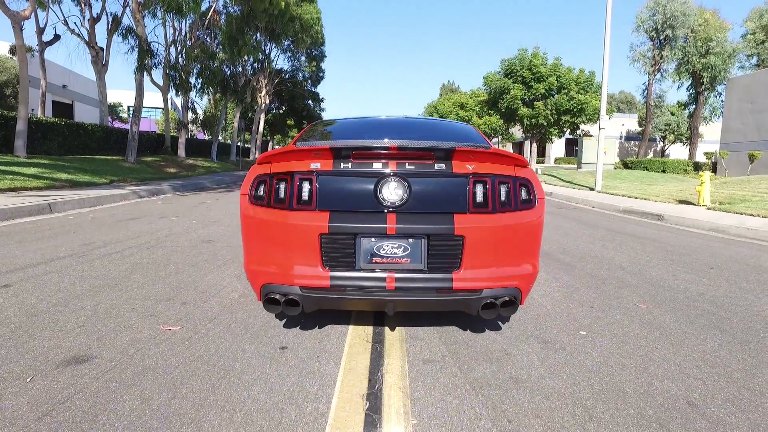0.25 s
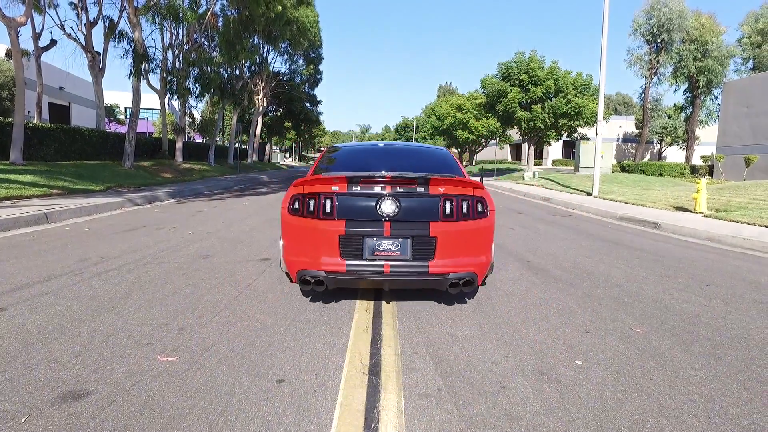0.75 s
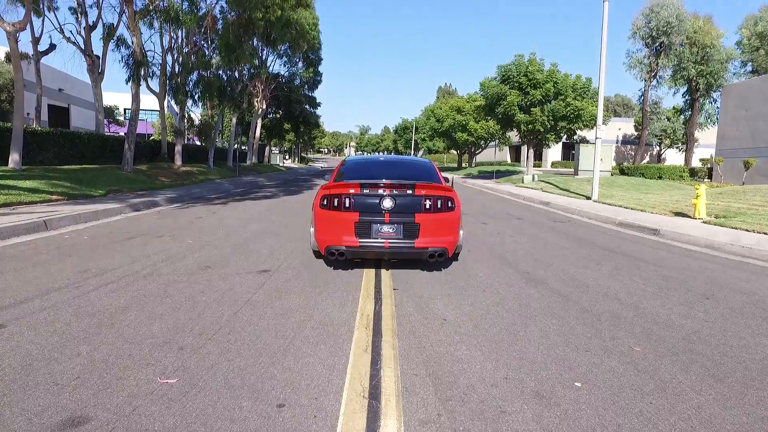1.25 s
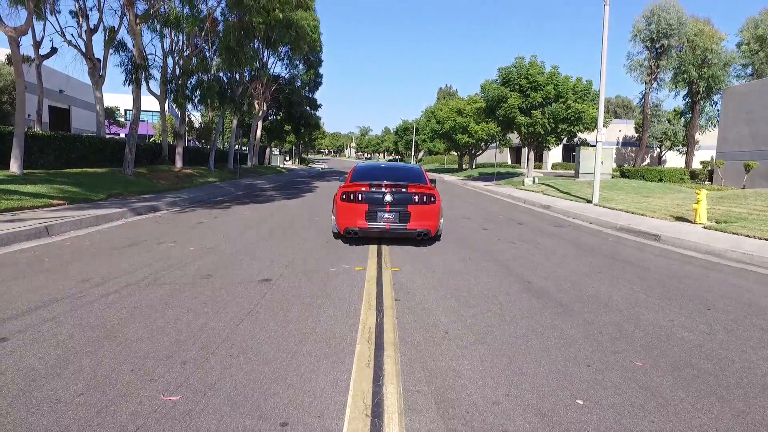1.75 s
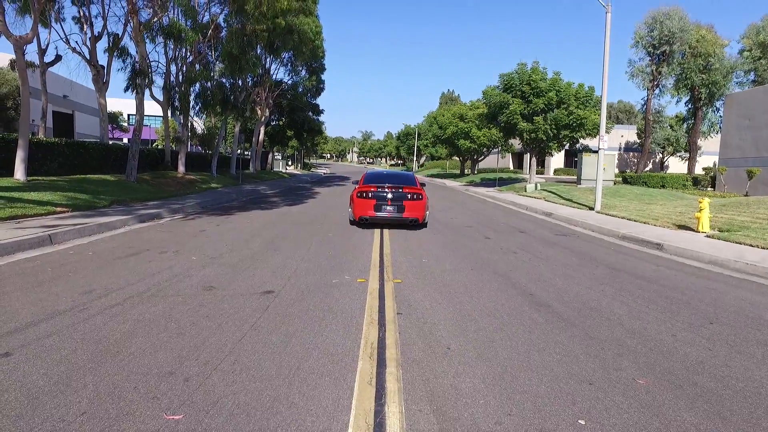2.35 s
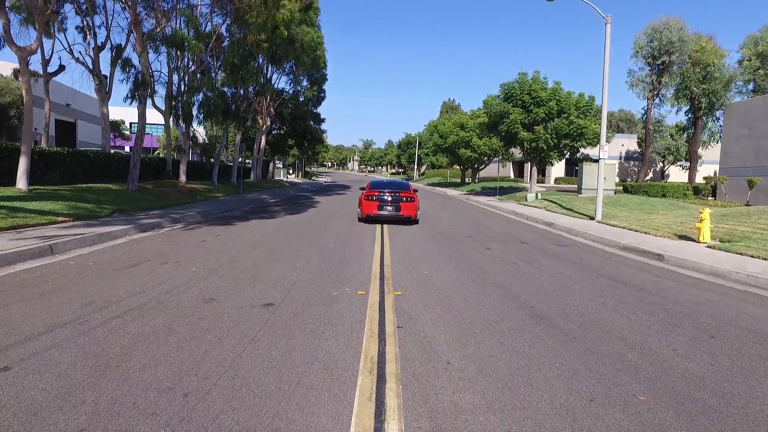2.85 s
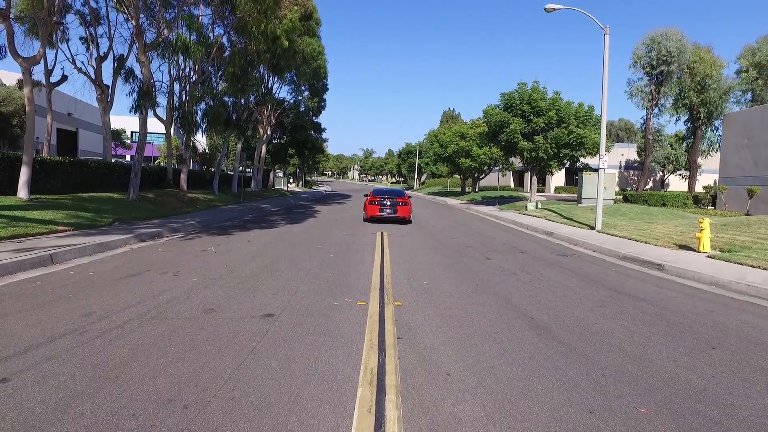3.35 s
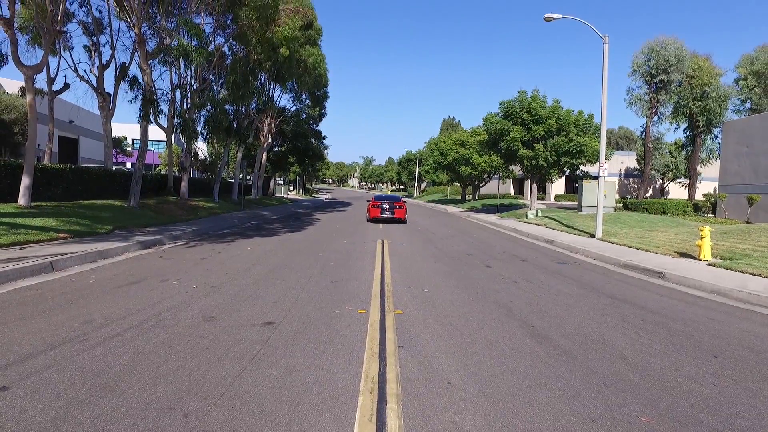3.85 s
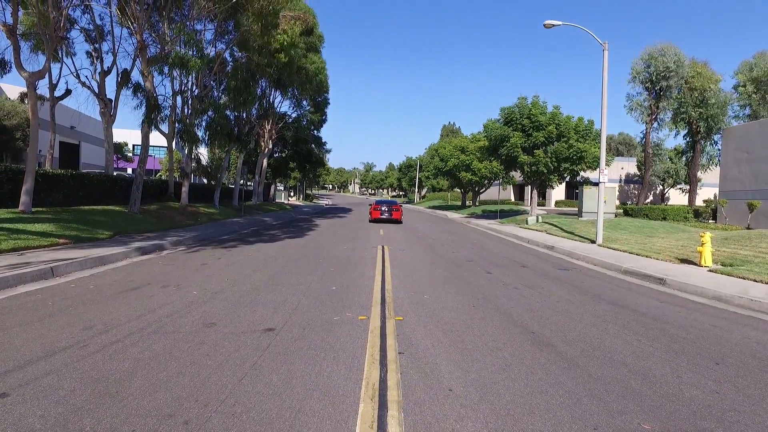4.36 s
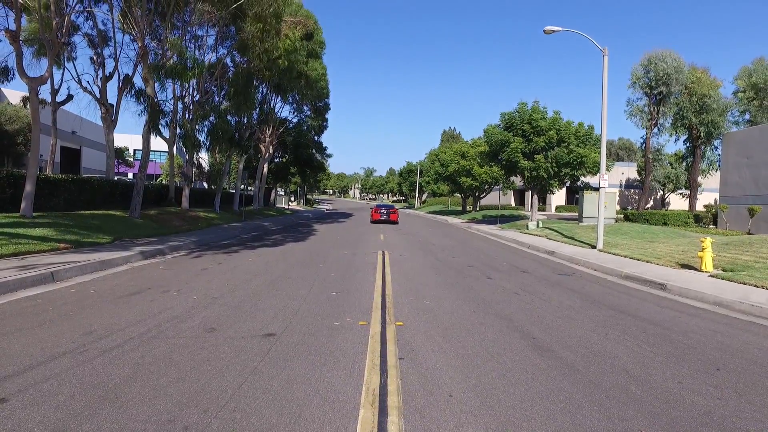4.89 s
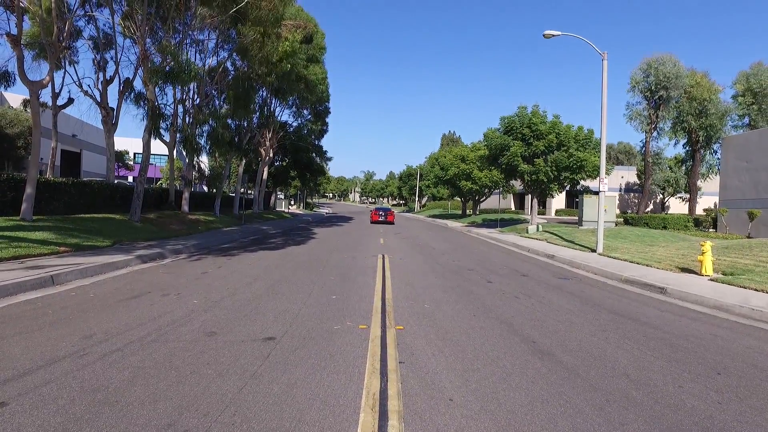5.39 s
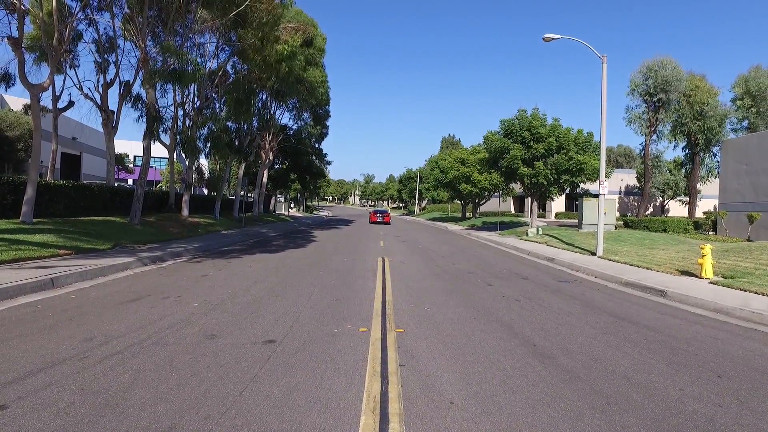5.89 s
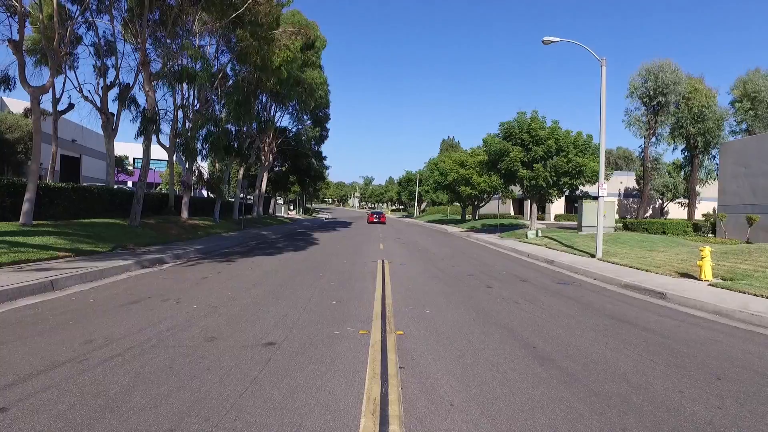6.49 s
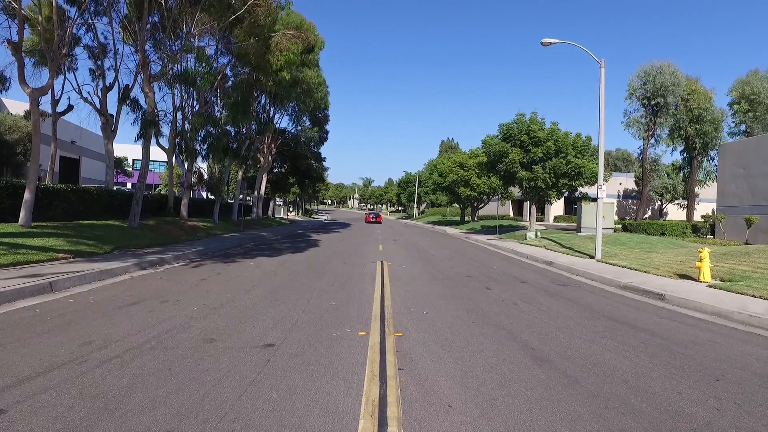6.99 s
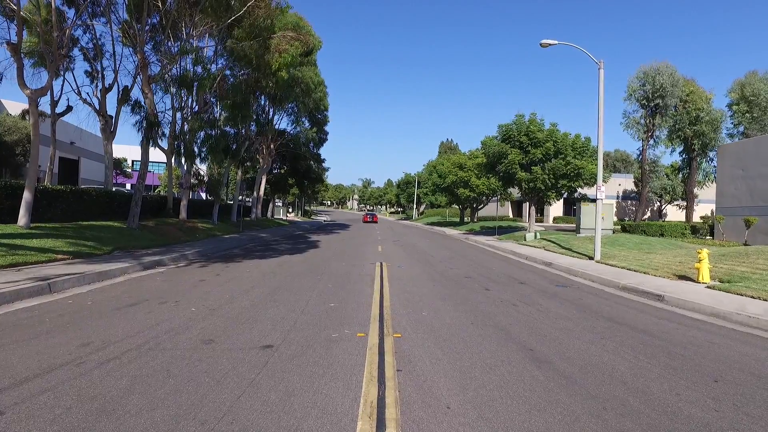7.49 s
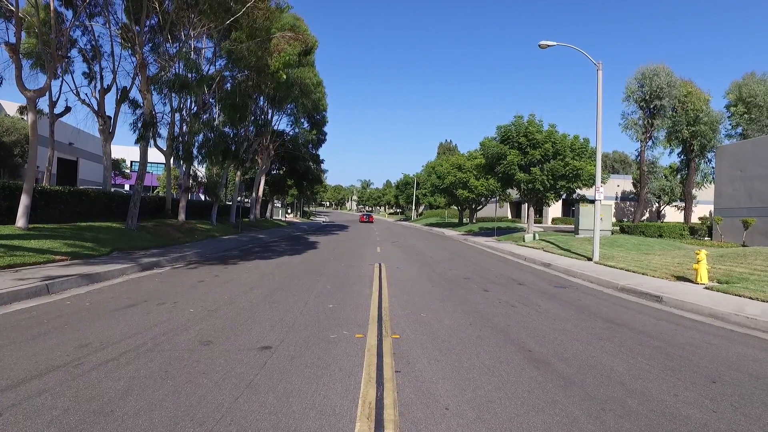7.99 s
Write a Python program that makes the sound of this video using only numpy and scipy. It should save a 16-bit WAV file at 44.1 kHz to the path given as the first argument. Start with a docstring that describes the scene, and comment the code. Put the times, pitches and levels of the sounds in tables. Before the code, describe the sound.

Overloaded exhaust blast, then a muscle car's deep growl rising to a hard snarl down the road before a popping, burbling coast-down.

```python
"""A supercharged V8 pulls away hard past a microphone low on the road, its blast overloading the nearby input,
which flattens the peaks and crackles on the hardest ones. The car then climbs through one long gear, with
crackles and a few pops; at 7 s the driver lifts off and it coasts down, droning and popping.
The exhaust sums harmonics of the firing rate, the burble of uneven pulses and gas noise gated by the pulses;
filtered noise makes the road, wind, intake and hiss."""
import sys
import numpy as np
from scipy import signal
from scipy.fft import rfft, irfft
from scipy.io import wavfile
from scipy.ndimage import uniform_filter1d, minimum_filter1d, map_coordinates

SR = 44100
rng = np.random.default_rng(int(sys.argv[2]) if len(sys.argv) > 2 else 0)


def dump_mix(stems):
    """Bounce the given channels to the path in sys.argv[1] as a 16-bit WAV at rate SR."""
    frames = np.atleast_2d(stems).T  # one column per channel
    limited = np.clip(frames, -1, 1)  # hard clip at full scale
    pcm = np.round(limited * 32767).astype(np.int16)
    wavfile.write(sys.argv[1], SR, pcm)


N = 363384

# The cylinders in firing order. Each row: strength (relative), lateness in firing periods.
CYLINDER_FIRINGS = [(0.39, 0.0019), (0.74, 0.096), (0.39, -0.063), (0.62, 0.025), (0.55, -0.11),
                    (0.77, 0.084), (0.76, 0.031), (0.47, -0.03)]
# Level at which peaks flatten, rising as the gain is turned up. Each row: time in seconds, level in dB.
CLIP_LEVEL = [(4.68, -23.9), (4.85, -18), (5, -14)]
# Dips as the driver lifts off. Each row: centre in seconds, half-length in seconds, depth in dB.
LIFT_DIPS = [(7.035, 0.061, -11.5), (7.505, 0.021, -8), (7.92, 0.022, -6)]
# The jet hits the nearby microphone. Each row: centre in seconds, half-length in seconds, extra level in dB.
JET_BLASTS = [(0.094, .125, 9.5)]
# Spectrum of a thin, high sizzle. Each row: frequency in Hz, density in dB per Hz.
SIZZLE_SPECTRUM = [(3000, -23), (5200, -11), (6100, 6), (6800, -12), (7500, -1), (9000, -19), (11200, -5),
                   (12500, -17), (16000, -34)]
# Spectrum of a sharp crack. Each row: frequency in Hz, density in dB per Hz.
CRACK_SPECTRUM = [(400, -14), (900, 8), (1800, 8.5), (2800, -3), (3700, -8), (5000, -15), (8000, -27),
                  (15000, -44.5)]


def amp(db):
    """Amplitude is ten to the power of the level in dB over twenty."""
    return 10 ** (np.asarray(db) / 20)


def unit(x):
    """Dividing by the root mean square brings a signal to rms 1."""
    return x / np.sqrt(np.mean(x ** 2) + 1e-20)


def steady(x):
    """Dividing by the running rms over a third of a second evens out slow changes of level."""
    return x / np.sqrt(np.abs(uniform_filter1d(x * x, SR // 3)) + 1e-20)


def curves(rows):
    """Linear interpolation in time: one value per sample for each column after the time."""
    s, *cols = np.transpose(rows)
    return [np.interp(np.arange(N) / SR, s, c) for c in cols]


def wobble(rate):
    """A smooth random curve: a spline through random knots, rate of them a second."""
    knots = rng.standard_normal(int(N * rate / SR) + 4)
    return map_coordinates(knots, [np.arange(N) * rate / SR])


def swells(rows, order=2):
    """Sum of swells (centre s, half-length s, height): bell-shaped, or flat-topped at a higher order."""
    t = np.arange(N) / SR
    return sum(height * np.exp(-np.abs((t - s) / half) ** order) for s, half, height in rows)


def bursts(rows):
    """Gain of bell-shaped bursts whose heights are given in dB."""
    return swells([(s, half, amp(db)) for s, half, db in rows])


def colour(x, points, size=8192):
    """Minimum-phase filtering: folding the cepstrum makes a causal filter with the (Hz, dB) spectrum."""
    hz, db = np.transpose(points)
    gain = amp(np.interp(np.log(np.fft.rfftfreq(size, 1 / SR) + 1), np.log(hz), db))
    cepstrum = irfft(np.log(gain))
    cepstrum[1:size // 2] *= 2
    cepstrum[size // 2 + 1:] = 0
    return signal.fftconvolve(x, irfft(np.exp(rfft(cepstrum))))[:N]


def noise(points):
    """Spectral shaping of white noise, brought to rms 1."""
    return unit(colour(rng.standard_normal(N), points))


def pulses(at, sizes):
    """Impulses at fractional sample positions, each shared between its two neighbouring samples."""
    at = np.clip(at, 0, N - 2)
    whole = at.astype(int)
    part = at - whole
    return np.bincount(whole, sizes * (1 - part), N) + np.bincount(whole + 1, sizes * part, N)


def resonance(hz, centre_hz, width_hz, db):
    """Lorentzian power gain of one resonance at the frequency hz."""
    return amp(db) ** 2 / (1 + (2 * (hz - centre_hz) / width_hz) ** 2)


def crank():
    """Integrating the firing rate counts the firings; the crank starts part-way through its cycle."""
    # Each row: time in seconds, rate in firings per second.
    firing_rate = [(0.0, 62.16), (0.36, 50.16), (0.8, 58.7), (1.14, 62.92), (1.32, 72.05), (1.53, 76.84),
                   (1.91, 89.86), (2.4, 108.02), (2.89, 124.49), (3.02, 128.7), (3.21, 132.9),
                   (3.43, 140.6), (3.62, 144.35), (3.8, 149.34), (5.01, 180.06), (6.92, 222.82),
                   (7.05, 216), (7.416, 198.8), (7.742, 176), (8.02, 160), (8.24, 152)]
    rate = curves(firing_rate)[0]
    return rate, np.cumsum(rate) / SR - 2.8


def firing_tone(rate, firings, rough):
    """Harmonics of the engine cycle swell as they sweep through the resonances of the pipes."""
    # Main harmonics of the firing tone. Each row: multiple of the eight-firing cycle, level in dB.
    main_orders = [(8, 3), (16, 1.5), (24, -0.5)]
    # Resonances of the exhaust system. Each row: frequency in Hz, width in Hz, level in dB.
    pipe_modes = [(76, 17, -9.5), (117.6, 11.8, -0.5), (154.8, 15.2, -5), (220, 37, -13.5),
                  (320.5, 81, -12), (443.7, 12.7, -11.5), (499.3, 10, -5.5), (679, 23, -15)]
    # Weaker orders from uneven banks and steep fronts, each heard at one resonance.
    # Each row: multiple of the cycle, resonance frequency in Hz, width in Hz, level in dB.
    weak_orders = [(5, 127, 10, -25), (6, 118, 16, -13), (9, 221, 26, -21), (10, 121, 9.6, -1),
                   (13, 215, 8.1, -15), (14, 320, 20, -19), (15, 392, 36, -26), (18, 270, 55, -16),
                   (18, 410, 36, -16), (19, 480, 60, -25), (20, 250, 36, -18), (21, 420, 9.8, -18.5),
                   (21, 475, 22, -14), (22, 470, 30, -19.5), (23, 600, 40, -25), (24, 497, 34, -17),
                   (26, 434, 42, -6.5), (28, 412, 20, -17), (30, 405, 20, -20), (30, 680, 90, -30),
                   (31, 490, 22, -21), (32, 672, 26, -13), (32, 738, 20, -27), (32, 890, 24, -33),
                   (34, 505, 46, -15), (35, 474, 20, -17), (38, 472, 30, -20), (40, 900, 150, -30),
                   (42, 680, 60, -27), (48, 1000, 50, -33), (56, 1170, 60, -34)]
    # A side chamber of the muffler weakens what passes it: centre in Hz, width in Hz, depth in dB.
    side_chamber = (633, 235, -4.5)
    notch_hz, notch_width_hz, notch_depth_db = side_chamber
    cycle_hz = rate / len(CYLINDER_FIRINGS)
    powers = []
    for order, db in main_orders:
        pipe_gain = sum(resonance(order * cycle_hz, *mode) for mode in pipe_modes)
        powers.append((order, amp(db) ** 2 * pipe_gain))
    powers += [(order, resonance(order * cycle_hz, *mode)) for order, *mode in weak_orders]
    tone = np.zeros(N)
    for order, power in powers:
        multiple = order / len(CYLINDER_FIRINGS)
        # all orders crest together once per cycle, just after its first firing;
        # rough running shakes level and phase
        phase = 2 * np.pi * (firings - .08) * multiple
        notch_db = notch_depth_db * resonance(order * cycle_hz, notch_hz, notch_width_hz, 0)
        shake_db = 3 * rough * wobble(35)
        jitter = multiple * 1.3 * rough * wobble(30)
        tone += np.sqrt(2 * power) * amp(notch_db + shake_db) * np.cos(phase + jitter)
    return tone


def puffs(rate, firings, rough):
    """Cycle-to-cycle variation: unequal cylinders fire with scattered strength and timing."""
    # One cylinder is lifted level with the strongest, and stands out in one spell.
    # Each row: centre in seconds, half-length in seconds, extra strength.
    lope_spell = [(5.15, 0.23, 0.81)]
    lope = 0.37 + swells(lope_spell)
    n = np.arange(int(firings[0]), int(firings[-1]))
    on_beat = np.interp(n, firings, np.arange(N))
    i = on_beat.astype(int)
    period = SR / rate[i]  # samples
    cylinder = n % len(CYLINDER_FIRINGS)
    strength, late = np.array(CYLINDER_FIRINGS)[cylinder].T
    chance = rng.standard_normal((len(n), 2))
    size = strength + lope[i] * (cylinder == 0) + rough[i] * chance[:, 0]
    lag = late * period
    at = on_beat + lag + 0.1 * rough[i] * chance[:, 1] * period
    return on_beat, lag, at, size, period


def even_beat(on_beat, lag, sizes):
    """Averaging over the cycle: every firing becomes the mean of the eight around it."""
    shifted = [pulses(on_beat + np.roll(lag, k), np.roll(sizes, k)) for k in range(-4, 4)]
    return np.mean(shifted, axis=0)


def uneven_burble(uneven, lift_db):
    """Departures from an even beat fill the orders between the firing tones, filtered by the pipes."""
    # Each row: time in seconds, tailpipe burble in dB, muffler boom in dB, before the lifts and trims.
    burble_levels = [(0, -67.5, -33), (.3, -39, -35), (1.25, -39, -31.5), (1.5, -33, -68),
                     (1.87, -39, -35.5), (2.3, -32.5, -35), (3.3, -39, -36), (4.13, -47.5, -45.5),
                     (4.74, -48.5, -72), (5.0, -32, -40), (5.4, -32.5, -42.5), (5.8, -38.5, -38.5),
                     (6.8, -45.5, -43.5), (7.3, -35.5, -35.5), (7.65, -46, -37.5), (8.24, -57, -47.5)]
    # Each row: frequency in Hz, response in dB.
    muffler_response = [(20, -30), (45, -22.5), (75, -17), (110, -1.5), (145, -4), (190, -5), (240, -6.5),
                        (330, -27), (700, -68), (2000, -120)]
    # Each row: frequency in Hz, response in dB.
    tailpipe_response = [(60, -33), (200, -4), (285, 2), (360, -7.5), (430, 0), (490, 2.5), (540, -14.5),
                         (700, -8.5), (900, -23), (1500, -43), (5000, -110)]
    burble_db, boom_db = np.array(curves(burble_levels)) + 0.1 * lift_db
    boom = amp(boom_db - 5.5) * steady(colour(uneven, muffler_response))
    burble = amp(burble_db - 2.0) * steady(colour(uneven, tailpipe_response))
    return boom + burble


def front_bark(ragged, bark_db):
    """Nonlinear steepening: the ragged part of the sharpened fronts excites the mid frequencies."""
    # Each row: frequency in Hz, response in dB.
    bark_response = [(100, -38.5), (300, 4.5), (520, -16), (600, 11.5), (740, 12), (830, 3), (950, 3.5),
                     (1150, -1), (1400, -14.5), (2300, -15.5), (2800, -29.5), (3500, -36), (6000, -53)]
    return amp(bark_db) * steady(colour(ragged, bark_response))


def gas_rasp(at, steep, bark_db):
    """Amplitude modulation: each front drags a decaying burst of turbulence noise behind it."""
    # Each row: frequency in Hz, density in dB per Hz.
    gas_spectrum = [(400, -59), (1000, -19), (1500, 0), (1850, -5), (2300, 8.5), (2700, -4.5), (3300, -22),
                    (5000, -37), (9000, -45), (16000, -52)]
    # The rasp flares as a harmonic sets the tailpipes ringing.
    # Each row: centre in seconds, half-length in seconds, rise in dB.
    flares = [(4.5, 0.58, 5.5), (5.02, 0.14, 4), (6.835, 0.081, 9.5), (7.32, 0.22, 0.5)]
    # A thin sizzle after the throttle shuts.
    # Each row: centre in seconds, half-length in seconds, level in dB.
    sizzle_spells = [(7.26, 0.087, -68.5), (7.41, 0.066, -74)]
    eddies = pulses(at, steep * amp(1.7 * rng.standard_normal(len(at))))
    decay_s = 0.0028
    gate = unit(signal.lfilter([1], [1, -np.exp(-1 / (decay_s * SR))], eddies))
    # the rasp follows the bark dB for dB
    rasp_db = bark_db - 22.5 + swells(flares, order=6)
    rasp = amp(rasp_db) * steady(noise(gas_spectrum) * (gate + 0.42))
    sizzle = bursts(sizzle_spells) * steady(noise(SIZZLE_SPECTRUM) * (gate + 0.33))
    return rasp + sizzle


def street(x):
    """Diffuse reflection: trees and walls return a weak, scattered echo."""
    t = np.arange(SR // 2) / SR
    # the tail falls 60 dB in 0.22 s and starts after 12 ms
    tail = rng.standard_normal(len(t)) * amp(-60 * t / .22) * (t > .012)
    far = signal.sosfilt(signal.butter(2, 350, "highpass", fs=SR, output="sos"), x)
    return signal.fftconvolve(far, tail / np.linalg.norm(tail))[:N]


def exhaust():
    """Superposition: a firing tone and the growl of eight unequal cylinders, with the growl's echo."""
    # Scatter from firing to firing. Each row: time in seconds, roughness from 0 to 1.
    roughness = [(1.5, .17), (2.3, .07), (4.6, .045), (5.2, .085), (6.8, .12), (7.2, .14), (7.7, .24)]
    # How hard the throttle makes the exhaust bark. Each row: time in seconds, level in dB before the lifts.
    throttle_bark = [(0, -26), (.3, -80), (.8, -39), (1.15, -54), (1.4, -71), (1.92, -53), (2.2, -42.5),
                     (2.8, -42), (3.6, -45.5), (4.2, -52), (4.5, -52), (4.75, -48), (5.05, -40),
                     (5.4, -41.5), (6.35, -47), (6.85, -42), (7.1, -46.5), (7.3, -39), (7.7, -51.5),
                     (8.24, -61)]
    # Firing tone before the pipes, lifts and blast. Each row: time in seconds, level in dB.
    tone_level = [(0, -25), (1, -25), (1.6, -25), (2, -28), (2.4, -30.5), (2.75, -28), (3.2, -25.5),
                  (4.15, -33.5), (4.42, -27), (4.75, -29), (5.05, -24), (5.6, -24.5), (6.5, -21),
                  (6.87, -20), (7.1, -26), (7.35, -34), (7.6, -41.5), (8.24, -56)]
    rate, firings = crank()
    rough, lift_db = curves(roughness)[0], swells(LIFT_DIPS)
    bark_db = curves(throttle_bark)[0] + .5 * lift_db
    blast = amp(swells(JET_BLASTS, order=8))
    tone = firing_tone(rate, firings, rough) * amp(curves(tone_level)[0] + lift_db) * blast
    on_beat, lag, at, size, period = puffs(rate, firings, rough)
    uneven = pulses(at, size) - even_beat(on_beat, lag, size)
    # strong puffs steepen into sharper fronts than weak ones
    steep = np.abs(size) ** 1.6
    ragged = pulses(at, steep) - .92 * even_beat(on_beat, lag, steep)
    growl = uneven_burble(uneven, lift_db) + front_bark(ragged, bark_db)
    growl = growl + gas_rasp(at, steep, bark_db) + crackle(at, size, period)
    # the echo gains on the direct sound as the car draws away
    echo_db = np.linspace(-14, -6, N)
    return tone + growl + amp(echo_db) * street(growl)


def jet():
    """Flow pressure: the near exhaust jet leans steadily on the diaphragm and churns against it."""
    # Turbulence of the jet. Each row: frequency in Hz, density in dB per Hz.
    churn_spectrum = [(30, -1.5), (110, 0.5), (300, -8), (700, -22), (2000, -49), (6000, -60)]
    near = swells([(s, half, 1) for s, half, db in JET_BLASTS], order=16)
    push_db, churn_db = -13.9, -35
    return near * (amp(push_db) + amp(churn_db) * noise(churn_spectrum))


def air():
    """Broadband noise: tyre roar, wind buffets, the supercharger's intake and a thin high hiss."""
    # Tyre roar. Each row: frequency in Hz, density in dB per Hz.
    road_spectrum = [(15, -43), (25, -38.5), (80, -16.5), (119, -23), (152, -7), (182, -39), (255, -25.5),
                     (325, -18), (485, -14.5), (655, -43), (3000, -55.5), (3900, -100.5), (6600, -120)]
    # Gusts on the microphone. Each row: centre in seconds, half-length in seconds, level in dB.
    gusts = [(.12, 0.27, -36), (.76, 0.31, -32), (3.15, 0.15, -46), (5.8, 0.071, -39.5)]
    # Air whistling through the supercharger. Each row: frequency in Hz, density in dB per Hz.
    intake_spectrum = [(1000, 1), (1700, -11.5), (2300, -1.5), (2800, -8), (3500, -19.5), (6000, -28.5),
                       (8000, -21.5), (9500, -30), (11200, -12.5), (12500, -33), (14800, -22),
                       (16000, -48.5)]
    # The intake fades as the car leaves. Each row: time in seconds, mean level in dB.
    intake_fade = [(.5, -53), (1.55, -58), (1.7, -60.5), (2.05, -66), (3.2, -62.5), (4, -83.5)]
    # Each row: frequency in Hz, density in dB per Hz.
    hiss_spectrum = [(1500, -25), (3000, -9), (4100, -8), (4500, 0), (5000, -10), (5800, -3), (7000, -7),
                     (9500, -10), (11500, -9), (12800, -17), (14300, -10), (15200, -18), (15600, -35)]
    wind_spectrum = [(10, 3.5), (30, -9.5), (60, 7.0), (120, -12.0), (400, -58.5), (2000, -100)]
    road = amp(-44.5 + 0.7 * wobble(7.8)) * noise(road_spectrum)
    # breeze and hiss rise as the gain is turned up
    clip_db = curves(CLIP_LEVEL)[0]
    rise_db = clip_db - clip_db.min()
    breeze = amp(-76 + 0.79 * rise_db)
    wind = (breeze + bursts(gusts)) * noise(wind_spectrum)
    intake = amp(curves(intake_fade)[0] + 3.85 * wobble(66)) * noise(intake_spectrum)
    hiss = amp(-81 + 0.68 * rise_db) * noise(hiss_spectrum)
    return road + wind + intake + hiss


def spikes(pressure):
    """Wave steepening: the hardest puffs lift the wave to a crest and pile a brief spike on top of it."""
    # Each row: time in seconds, width in seconds.
    spike_times = [(.0455, .0007), (.0995, .0008), (.2147, .0002), (.2233, .0024), (.2542, .0005),
                   (.3898, .00077), (.4289, .0007), (.5071, .00073), (.5645, .0005), (.6572, .00084),
                   (.7112, .00093), (.728, .00245), (.737, .00039), (.7449, .00145), (.7975, .00215),
                   (.8057, .00079), (.8137, .00125), (.8221, .00068), (.8313, .00306), (.8654, .00041),
                   (.9306, .00166), (1.5273, .00043), (1.5793, .0007), (2.2049, .0005), (2.284, .00032),
                   (2.5218, .00014), (2.7959, .00025), (2.8609, .00018), (2.9636, .00004), (3.0261, .00043),
                   (3.0427, .0002), (3.0878, .00041), (3.1488, .00043), (3.2091, .00034), (3.2691, .00013),
                   (3.3282, .00008), (3.3862, .00018)]
    out, offsets = np.zeros(N), np.arange(-SR // 150, SR // 150)
    t = offsets / SR
    for s, width in spike_times:
        i = round(s * SR) + offsets
        swell = np.exp(-(t / (.0007 + width)) ** 4)
        # a narrow peak with its tip cut flat
        spike = np.minimum(amp(-11) / (1 + (2 * t / width) ** 2), amp(-14))
        out[i] += swell * (amp(-25) - pressure[i] + spike)
    return out


def crackle(at, size, period):
    """Shock formation: under full load the fronts steepen, and each puff trails a small sharp crack."""
    # Each row: centre in seconds, half-length in seconds, level in dB, widest swing between cracks in dB.
    spells = [(2.85, .62, -61, 14), (3.62, .22, -67, 10), (4.48, .16, -54, 4)]
    lag_periods = .25
    out = np.zeros(N)
    for s, half, db, scatter_db in spells:
        strength = size * amp(scatter_db * rng.uniform(-1, 1, len(at)))
        cracks = unit(colour(pulses(at + lag_periods * period, strength), CRACK_SPECTRUM))
        out += cracks * swells([(s, half, amp(db))], order=8)
    return out


def pops():
    """Impulse response: single hard puffs leave the tailpipe as a crack and a decaying spit of gas."""
    # Each row: time in seconds, crack peak in dB, spit level in dB.
    pop_times = [(4.4785, -35, -70), (4.526, -37, -67), (4.5742, -30, -66), (4.6212, -30.5, -62),
                 (4.669, -35, -62), (4.7148, -39, -71), (7.126, -42, -69), (7.164, -43, -56),
                 (7.2217, -42, -50), (7.259, -41, -47.5), (7.273, -41, -55), (7.339, -48, -59),
                 (7.358, -46, -55), (7.398, -43, -66), (7.439, -39, -64), (7.459, -40, -55)]
    s, crack_db, spit_db = np.transpose(pop_times)
    peak = np.abs(colour(np.ones(1), CRACK_SPECTRUM)).max()
    cracks = colour(pulses(s * SR, amp(crack_db)), CRACK_SPECTRUM) / peak
    decay_s = 0.0012
    spits = signal.lfilter([1], [1, -np.exp(-1 / (decay_s * SR))], pulses(s * SR, amp(spit_db)))
    return cracks + spits * noise(SIZZLE_SPECTRUM)


def overrun():
    """Harmonic series of the crank turn with the throttle shut: a deep drone and a resonant snarl."""
    # Each row: time in seconds, drone in dB, snarl in dB, before the lifts.
    overrun_levels = [(6.85, -73, -99), (6.98, -34, -59), (7.1, -31, -48), (7.24, -31.5, -38.5),
                      (7.46, -31.5, -41.5), (7.58, -29, -47.5), (7.8, -33.5, -49), (8.0, -40.5, -62),
                      (8.24, -44.5, -76)]
    # Each row: multiple of the cycle, relative level in dB.
    drone_orders = [(4, -15.5), (6, -1.5)]
    # Each row: multiple of the cycle, relative level in dB.
    snarl_orders = [(12, 2.5), (14, -2)]
    # The tailpipe's ring: frequency in Hz, width in Hz, relative level in dB.
    tailpipe_ring = (477, 40, 0.48)
    rate, firings = crank()
    drone_db, snarl_db = curves(overrun_levels)
    # the beat lags the first cylinder by 0.847 firing periods
    cycles = (firings - 0.847) / len(CYLINDER_FIRINGS)
    cycle_hz = rate / len(CYLINDER_FIRINGS)

    def line(order):
        """A sinusoid of one order, its level and phase wandering."""
        phase = 2 * np.pi * cycles * order + .1 * wobble(25)
        return np.sqrt(2) * amp(1.0 * wobble(22)) * np.cos(phase)

    drone = sum(amp(db) * line(order) for order, db in drone_orders)
    snarl = sum(amp(db) * line(order) for order, db in snarl_orders)
    # the orders that cross the tailpipe's ring
    for order in range(16, 26, 2):
        snarl = snarl + np.sqrt(resonance(order * cycle_hz, *tailpipe_ring)) * line(order)
    return amp(swells(LIFT_DIPS)) * (amp(drone_db) * drone + amp(snarl_db) * snarl)


def burps():
    """Modal synthesis: late, loose firings on the overrun thump the muffler and ring the tailpipe."""
    # Each row: time in seconds, level in dB.
    burp_times = [(7.67, -38), (7.715, -37), (7.784, -29), (7.878, -27), (7.983, -25), (8.041, -35),
                  (8.105, -29), (8.19, -37)]
    # What they ring. Each row: frequency in Hz, relative level in dB, 60 dB decay time in seconds.
    modes = [(127, -1, .07), (288, -14, 0.033), (483, -8.5, 0.058)]
    s, level_db = np.transpose(burp_times)
    t = np.arange(SR // 5) / SR
    ring = sum(amp(db - 60 * t / t60) * np.sin(2 * np.pi * hz * t) for hz, db, t60 in modes)
    ring = ring * (1 - np.exp(-t / .001))  # soft onset
    return signal.fftconvolve(pulses(s * SR, amp(level_db)), ring)[:N]


def scene():
    """Superposition of the car and the air around it, as pressure at the microphone."""
    pressure = exhaust() + jet() + overrun() + burps() + pops() + air()
    return (pressure + spikes(pressure))[None]


def record(dry):
    rail_spectrum = [(500, 12), (2000, -7), (16000, -5.5)]
    tick_spectrum = [(400, -14), (1300, -2.5), (2300, -8), (4000, -4.0), (6500, -6.5),
                     (10000, -6), (16000, -27.5)]
    top = amp(curves(CLIP_LEVEL)[0])
    drive = dry / top
    flat = drive / (1 + np.abs(drive) ** 16) ** (1 / 16)
    # pushed far past the limit, the output snaps to the opposite limit
    snap = np.tanh(25 * (3.1 - drive))
    # driven harder still, the snapped output sags back towards zero
    sag = 1 - np.clip((drive - 4.2) / 2.2, 0, 1)
    snapped = uniform_filter1d((1 - snap) / 2, size=300)
    rail_noise = amp(-41.0) * snapped * noise(rail_spectrum)
    # the deeper the overload and the faster the wave falls off the limit, the harder the tick
    recent_peak = -minimum_filter1d(-drive[0], size=180)
    depth = np.clip((recent_peak - 1) / .45, 0, 1)
    recovers = np.diff((drive[0] > 1).astype(float), prepend=0) < 0
    fall = np.clip(-np.gradient(drive[0]), 0, .1)
    ticks = amp(-16) * colour(recovers * depth * fall, tick_spectrum)
    # nothing passes far above 15.8 kHz
    lowpass = signal.ellip(10, .1, 90, 15800, fs=SR, output="sos")
    return signal.sosfilt(lowpass, top * flat * snap * sag + rail_noise + ticks)


dry = scene()
out = record(dry)
dump_mix(out)
```